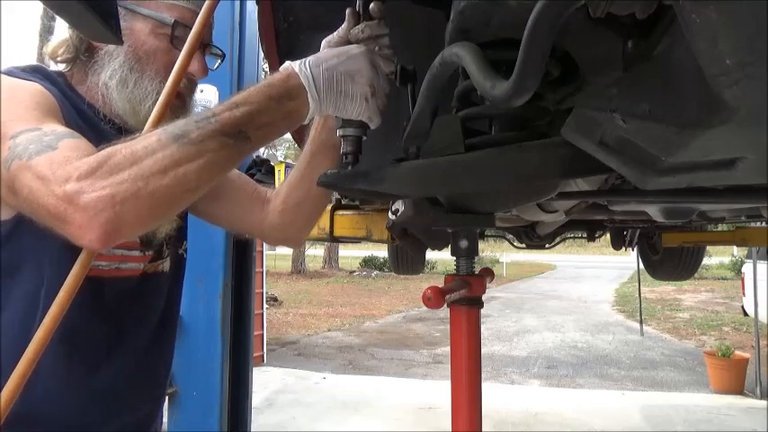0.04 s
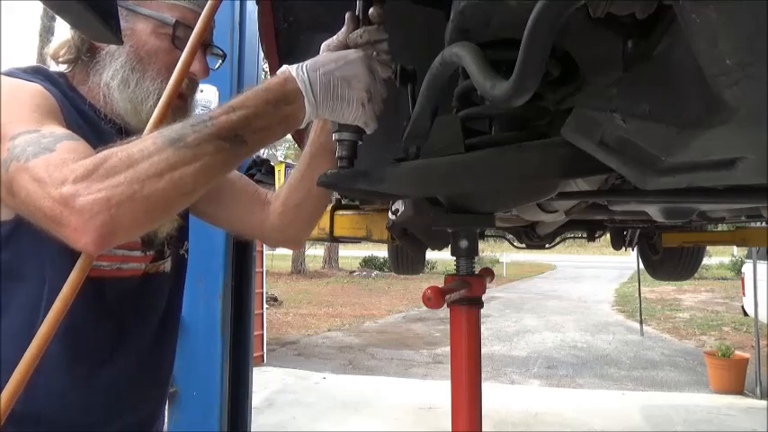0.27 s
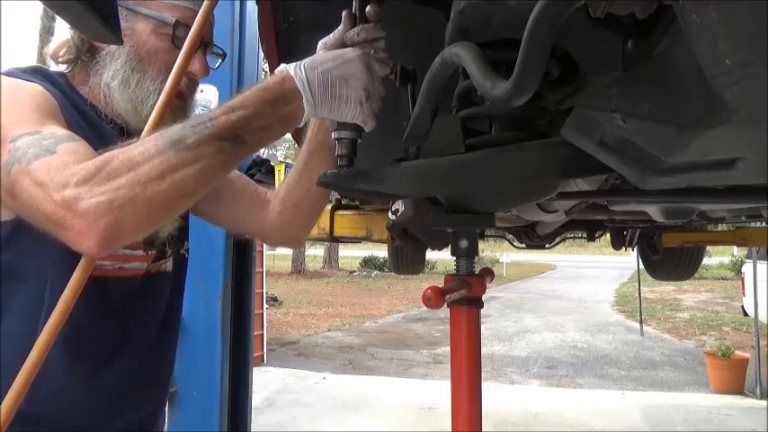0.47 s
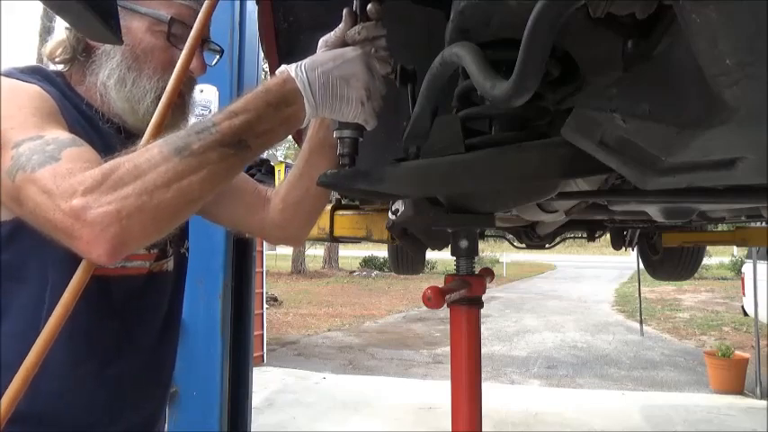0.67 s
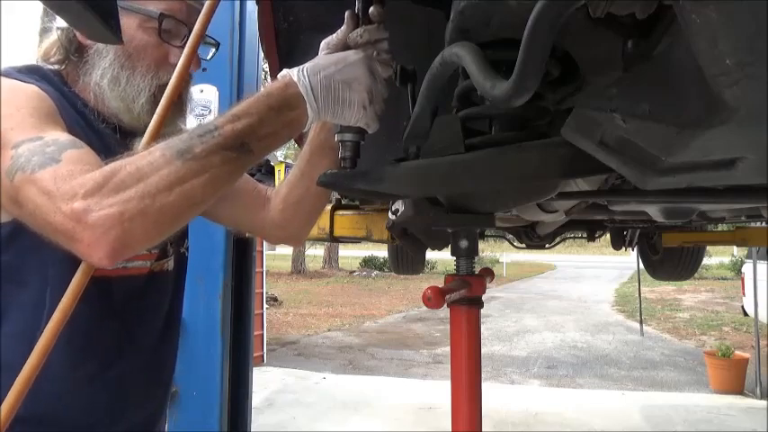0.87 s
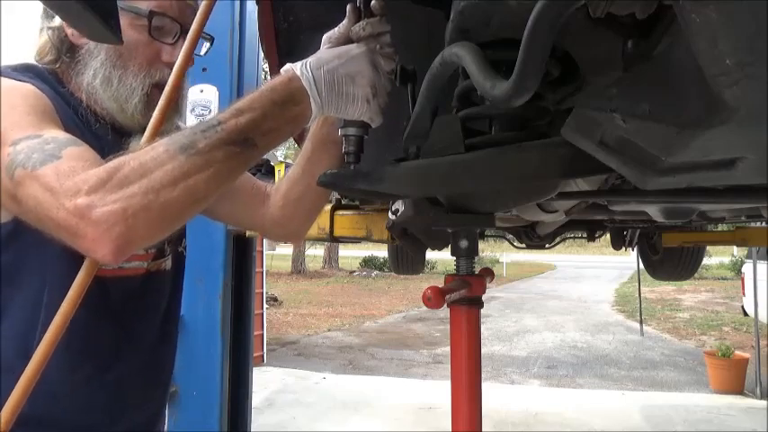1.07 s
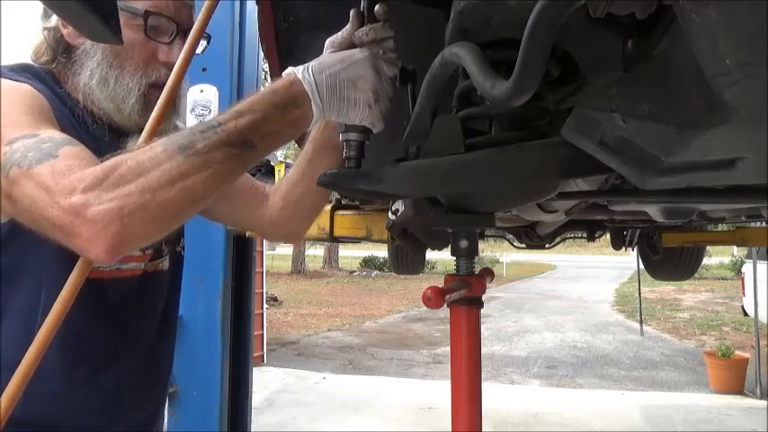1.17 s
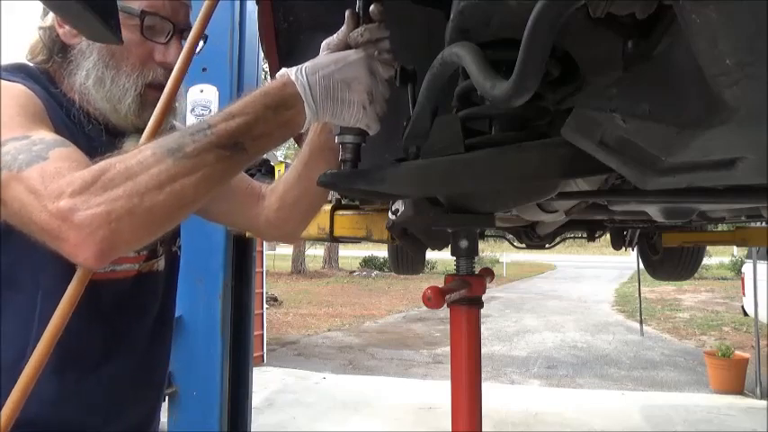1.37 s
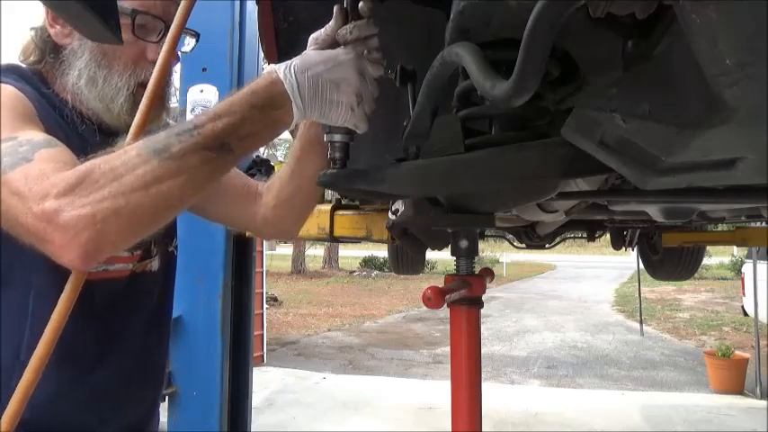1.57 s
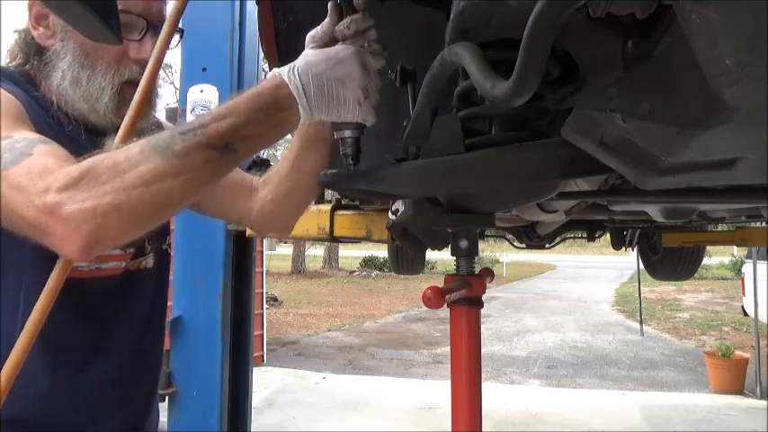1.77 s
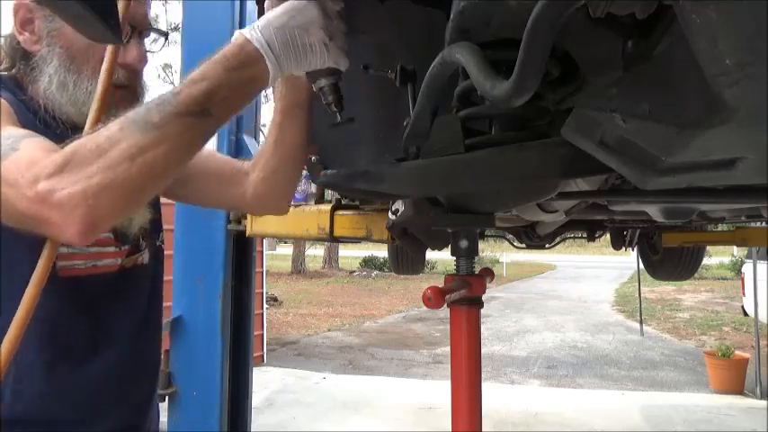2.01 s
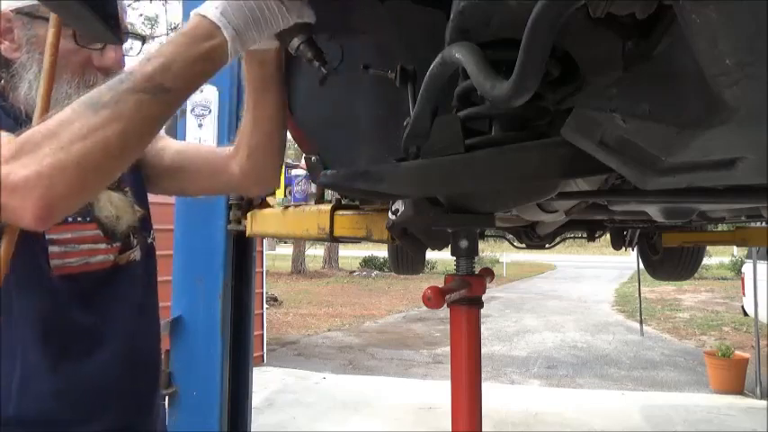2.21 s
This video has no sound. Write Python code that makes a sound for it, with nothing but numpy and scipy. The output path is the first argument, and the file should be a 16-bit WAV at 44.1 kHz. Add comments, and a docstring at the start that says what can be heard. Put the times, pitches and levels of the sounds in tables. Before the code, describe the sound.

An air die grinder rasps a wire wheel on rusty steel in two short whining bursts.

```python
"""An air die grinder spins a wire wheel in a rusty steel bore, in two bursts, in an open garage.
Its vanes puff out a whine, a pulse train through exhaust resonances, that rises and coasts down.
The wires rasp as dense random impacts, snag in short noise bursts and ring the steel.
The tool is drawn out with light knocks, decaying tones over thuds, and a soft bump.
A thin air leak (coloured noise) and a faint hum (an unsteady sine) remain."""
import sys
import numpy as np
from scipy import signal
from scipy.fft import rfft, irfft, next_fast_len
from scipy.io import wavfile
from scipy.ndimage import uniform_filter1d, map_coordinates

SR = 44100
rng = np.random.default_rng(int(sys.argv[2]) if len(sys.argv) > 2 else 0)


def digitize_waveform(pressure):
    """Quantize a signal to 16-bit integers and store it at the path in sys.argv[1].

    Rows of a 2-D input are taken as channels; values are limited to [-1, 1].
    """
    field = np.atleast_2d(pressure).T
    bounded = np.clip(field, -1, 1)
    quanta = np.round(bounded * 32767).astype(np.int16)
    wavfile.write(sys.argv[1], SR, quanta)


N = 99225
T = np.arange(N) / SR  # s
FULL_HZ, VANE_COUNT = 590, 4  # vane puffs a second near full speed; vanes on the rotor


def amp(db):
    """Level to gain: 20 dB is a factor of ten in amplitude."""
    return 10 ** (np.asarray(db) / 20)


def unit(x):
    """Power normalisation: scale to rms 1."""
    return x / np.sqrt(np.mean(x ** 2) + 1e-20)


def along(points, hz):
    """Interpolation of (Hz, value) points on a logarithmic frequency axis."""
    f, v = np.transpose(points)
    return np.interp(np.log(hz + 1), np.log(f + 1), v)


def curve(rows):
    """Linear interpolation of (s, value) rows, one value per sample."""
    return np.interp(T, *np.transpose(rows))


def wobble(rate):
    """Band-limited fluctuation: a smooth curve through random knots, rate knots a second."""
    knots = rng.standard_normal(2 * N)
    return map_coordinates(knots, [T * rate + 2], mode="nearest")


def coloured(x, points):
    """Minimum-phase filtering: a causal filter with the gain of the (Hz, dB) points."""
    m = 2 * next_fast_len(N)
    gain = amp(along(points, np.fft.rfftfreq(m, 1 / SR)))
    # folding the cepstrum onto positive times makes the response causal
    cepstrum = irfft(np.log(gain))
    cepstrum[1:m // 2] *= 2
    cepstrum[m // 2 + 1:] = 0
    response = np.exp(rfft(cepstrum))
    return irfft(rfft(x, m) * response)[:N]


def noise(points):
    """Spectral shaping of white noise, scaled to rms 1."""
    return unit(coloured(rng.standard_normal(N), points))


def dying(start, t60, attack):
    """Exponential decay of a blow, 60 dB in t60 seconds, after a short exponential attack."""
    t = np.maximum(T - start, 0)
    return amp(-60 * t / t60) * (1 - np.exp(-t / attack))


def swell(middle, length):
    """Gaussian envelope with standard deviation length, in seconds."""
    return np.exp(-((T - middle) / length) ** 2 / 2)


def wire_strikes(rate, scatter_db):
    """Poisson-like impacts, rate a second; dividing by its root keeps the power even."""
    hit = rng.random(N) < rate / SR
    sign = rng.choice([-1, 1], N)
    size = amp(scatter_db * rng.standard_normal(N))
    return unit(hit * sign * size / np.sqrt(rate))


def background():
    """Superposed steady sources: garage air, hum, turbulent leak, and the barely opened valve."""
    # colour of the garage air: freq_hz, gain_db
    garage_air = [(25,-25),(100,1.5),(200,3),(290,6),(330,-10),(372,9),(450,-15),(600,-30),(780,-2.5),(1200,-12),(1800,-6),(2500,-10),(3100,8.5),(3700,0),(4700,7),(6500,-11),(9000,0),(16000,-4)]
    # colour of the air leak: freq_hz, gain_db
    leak_colour = [(100,-57),(6500,-16),(9000,-6),(10500,2.5),(11500,1),(13000,-12),(14500,-3),(16000,-41)]
    # the leak swells as the hose turns: time_s, level_db
    leak_level = [(0,-46.5),(1.68,-50.5),(1.85,-47),(2.0,-52),(2.25,-45)]
    # colour of the barely opened valve: freq_hz, gain_db
    valve_colour = [(100,-52),(700,-9.5),(1800,-30),(3200,-7.5),(3700,-17),(4300,-4),(4900,-7),(5700,-31),(7500,-22),(16000,-38)]
    hum_hz, hum_db = 162, -63
    air_db, valve_db = -51.5, -43.5

    hum_tone = np.sqrt(2) * np.sin(2 * np.pi * hum_hz * T + .3 * wobble(7))
    hum = hum_tone * amp(hum_db + 2 * wobble(12))
    leak = noise(leak_colour) * amp(curve(leak_level) + 2.4 * wobble(14.13))
    valve = noise(valve_colour) * amp(valve_db) * np.interp(T, [.25, .35], [1, 0])
    return hum + leak + valve + amp(air_db) * noise(garage_air)


def room(x):
    """Reverberation from underbody and walls: a noise tail with frequency-dependent decay."""
    # reverberation time: freq_hz, t60_s
    room_t60 = [(200,0.14),(1500,0.13),(5000,0.076),(12000,0.093)]
    hz, t, bins = signal.stft(rng.standard_normal(SR // 2), SR, nperseg=256)
    decay = amp(-60 * t / along(room_t60, hz)[:, None])
    tail = signal.istft(bins * decay, SR, nperseg=256)[1]
    delayed = np.pad(tail, (90, 0))  # 90 samples, about 2 ms, before the reflections
    return signal.fftconvolve(x, delayed / np.linalg.norm(tail))[:N]


def handling():
    """Damped broadband impact: a soft bump of the tool as it is lifted out."""
    bump_colour = [(40, -26), (160, -13), (280, 13), (450, -10),
                   (1200, -5), (3000, -16), (16000, -35)]  # freq_hz, gain_db
    return amp(-46.5) * noise(bump_colour) * dying(1.8, 0.33, attack=0.0048)


def knocks():
    """Modal excitation as the wheel bumps the steel: a short rough ring over a noisy thud."""
    # knocks on the steel: start_s, level_db, ring_hz, ring_t60_s, thud_over_ring_db
    knock_rows = [(0.235,-8.5,1260,0.037,-9),(1.599,-25.5,1520,0.12,4),(1.747,-49.5,1490,0.076,6.5),(1.795,-41.5,2030,0.066,-0.5)]
    # colour of the thud: freq_hz, gain_db
    thud_colour = [(60,-28),(250,-14.5),(650,-0.5),(1300,3.5),(2000,-1.5),(2400,-4),(3000,-3.5),(3600,-3),(6000,-3),(16000,-27)]
    thud_t60_s = 0.08
    out = np.zeros(N)
    for start, db, hz, t60, thud_db in knock_rows:
        tone = np.sin(2 * np.pi * hz * (T - start) + .5 * wobble(200))
        ring = tone * dying(start, t60, attack=0.0024)
        thud = amp(thud_db) * noise(thud_colour) * dying(start, thud_t60_s, attack=0.00064)
        out += amp(db) * (ring + thud)
    return out


def snags():
    """Stick and release: tufts of wire catch and flick free as brief noise bursts."""
    # snagging tufts: middle_s, level_db, length_s
    snag_rows = [(0.2267,-18.5,0.0019),(0.232,-17.5,0.0018),(0.235,-15,0.00074),(0.2733,-7.5,0.0014),(0.286,-16,0.0019),(0.296,-11.5,0.0016),(0.649,-32,0.0011),(0.678,-15.5,0.00083),(0.6856,-14,0.00092),(0.693,-14,.001),(0.7,-19.5,0.0014),(0.719,-21,0.00067),(0.741,-24,0.0014),(0.7714,-16.5,0.00073),(0.7771,-18,0.0014),(0.7846,-15.5,0.00041)]
    # colour of a snag: freq_hz, gain_db
    snag_colour = [(40,-55),(150,-34),(600,-12),(1600,-4),(3200,-8),(4600,5),(5600,-1),(7000,-2),(9000,-4),(11000,0),(16000,-10)]
    bursts = sum(amp(db) * swell(middle, length) for middle, db, length in snag_rows)
    return noise(snag_colour) * bursts


def singing():
    """Narrow-band noise by quadrature modulation: at some angles the wire tips sing."""
    # singing wire tips: middle_s, length_s, level_db, centre_hz, width_hz
    singing_rows = [(0.555,0.084,-23,10050,910),(1.371,.09,-24,12560,1544),(1.512,0.038,-21.5,9830,642)]
    out = np.zeros(N)
    for middle, length, db, hz, width in singing_rows:
        phase = 2 * np.pi * hz * T
        band = wobble(width) * np.cos(phase) + wobble(width) * np.sin(phase)
        out += amp(db) * swell(middle, length) * band
    return out


def patchy(x, depth_db):
    """Time-varying filtering: the wires meet ever new spots, so the rasp's colour keeps shifting."""
    bins = signal.stft(x, nperseg=512)[2]
    across_hz = uniform_filter1d(rng.standard_normal(bins.shape), size=7, axis=0)
    field = uniform_filter1d(across_hz, size=12, axis=1)
    return signal.istft(bins * amp(depth_db * unit(field)), nperseg=512)[1][:N]


def wire_wheel(puff_hz, puffs):
    """Impact excitation: wire tips strike rust, denser at speed, beating with shaft and vanes."""
    # how hard the wires scrub, before the rasp trim: time_s, level_db
    scrub = [(0.1,-48),(0.15,-31),(0.19,-25),(0.215,-24),(0.228,-25.5),(0.255,-26),(0.278,-22),(0.305,-12),(0.45,-16),(0.53,-13.5),(0.62,-16.5),(0.7,-30.5),(0.735,-29.5),(0.765,-27),(0.81,-19),(0.85,-11),(1.0,-12.5),(1.22,-15.5),(1.43,-12.5),(1.53,-17.5),(1.57,-20),(1.605,-33.5),(1.635,-52)]
    # colour of the rasp: freq_hz, gain_db
    rasp_colour = [(30,-7),(130,-56),(280,-37),(500,-8),(800,-19.5),(1300,-5),(2200,-1.5),(3200,1),(4000,6),(5100,8.5),(6500,3),(7600,4.5),(8600,2),(10000,8),(11300,5.5),(12600,4),(14500,-0.5),(16000,-11.5)]
    # ring of the bore under the wires: time_s, level_db
    bore_ring = [(0.12,-53.5),(0.2,-36.5),(0.3,-31),(0.45,-36.5),(0.52,-28.5),(0.63,-26.5),(0.73,-36.5),(0.86,-46),(1.1,-53),(1.38,-30.5),(1.5,-16.5),(1.56,-24.5),(1.62,-45),(1.68,-67)]
    # resonances of the bore: freq_hz, gain_db
    bore_colour = [(30,-70),(250,-30),(550,-16),(900,-10),(1250,0),(1700,2),(2100,-4),(2900,-20),(3900,-20),(4500,-8),(5300,-8),(6000,-22),(16000,-45)]
    # dull grinding under load, as the wheel bites or drags to a stop: time_s, level_db
    grind_level = [(0.13,-64),(0.19,-42.5),(0.27,-43),(0.31,-21),(0.37,-54),(0.46,-50),(0.56,-29.5),(0.66,-37),(0.73,-39.5),(0.78,-34),(0.86,-23.5),(0.93,-51),(1.25,-61),(1.4,-47),(1.5,-34),(1.58,-32.5),(1.68,-49.5),(1.74,-55)]
    # colour of the grinding: freq_hz, gain_db
    grind_colour = [(30,-65),(110,-24),(200,-15.5),(320,-5.5),(460,3.5),(650,5.5),(800,5),(1100,7.5),(2000,6),(5000,-22),(16000,-42)]
    rasp_trim_db = -1.5
    shaft_beat, vane_beat = 0.067, 0.14  # modulation depths

    shaft = shaft_beat * np.cos(2 * np.pi * puffs / VANE_COUNT)
    beat = 1 + shaft + vane_beat * np.cos(2 * np.pi * puffs)
    # the rasp is more uneven when slow
    unevenness = amp(0.45 * wobble(260) * np.sqrt(FULL_HZ / puff_hz))
    strikes = wire_strikes(puff_hz * 36, scatter_db=1.5) * beat * unevenness
    rasp = unit(coloured(strikes, rasp_colour)) * amp(curve(scrub) + rasp_trim_db)
    rasp *= np.interp(T, [.06, .12, 1.62, 1.68], [0, 1, 1, 0])
    bore_strikes = wire_strikes(puff_hz * 6, scatter_db=2.5) * beat
    ring = unit(coloured(bore_strikes, bore_colour)) * amp(curve(bore_ring))
    grind_strikes = wire_strikes(puff_hz * 4, scatter_db=1) * beat
    grind = unit(coloured(grind_strikes, grind_colour)) * amp(curve(grind_level))
    return rasp + ring + grind


def exhaust(puff_hz, puffs, scatter_db=.5, jitter_s=.000004):
    """Source and filter: one puff per vane excites low and shrill exhaust resonances."""
    # relative puff size of each vane, in order round the rotor: size
    vane_sizes = [1.05, .98, 1.01, .96]
    # level of the whine's fundamental: time_s, level_db
    fundamental_level = [(0.28,-52),(0.335,-38.5),(0.372,-42),(0.41,-28.5),(0.49,-26.5),(0.515,-39),(0.54,-25),(0.59,-43.5),(0.68,-62),(0.8,-60.5),(0.88,-42.5),(0.945,-44.5),(1.02,-27),(1.105,-33.5),(1.17,-26.5),(1.26,-27.5),(1.295,-38),(1.33,-25.5),(1.375,-39.5),(1.42,-26),(1.49,-46),(1.57,-46.5),(1.61,-64)]
    # level of the whine's middle overtones: time_s, level_db
    overtone_level = [(0.28,-36),(0.33,-22.5),(0.41,-25.5),(0.48,-24.5),(0.52,-16),(0.57,-26),(0.64,-37),(0.69,-38),(0.79,-58),(0.85,-21),(0.93,-22),(1.0,-20.5),(1.1,-20.5),(1.17,-25.5),(1.28,-23.5),(1.38,-19),(1.46,-23),(1.54,-30.5),(1.6,-50)]
    # level of the shrill part, heard near full speed: time_s, level_db
    shrill_level = [(0.3,-55),(0.355,-27),(0.39,-17),(0.43,-15.5),(0.485,-18.5),(0.51,-32),(0.57,-55),(0.86,-55),(0.925,-26),(0.96,-15.5),(1.05,-17),(1.11,-16),(1.16,-18.5),(1.2,-16.5),(1.25,-18),(1.3,-14.5),(1.345,-22),(1.41,-32),(1.5,-55)]
    # low resonances of the exhaust: freq_hz, gain_db
    low_colour = [(100,-34),(300,-7),(480,-0.5),(650,2.5),(800,1.5),(950,0),(1080,1.5),(1170,5.5),(1300,-0.5),(1550,2),(1760,6),(2100,-9),(2350,-2.5),(3000,-4),(4000,-18),(16000,-75)]
    # shrill resonances of the exhaust: freq_hz, gain_db
    high_colour = [(500,-55),(2600,-36),(3250,-20),(3520,-6),(3680,-11),(4100,2),(4300,2),(4650,-3),(4900,-1),(5100,-3),(5400,-7),(5900,-13),(7000,-22),(8800,-17),(9500,-18),(9900,-9),(10600,-18),(16000,-32)]

    k = np.arange(1, int(puffs[-1]))
    chance = rng.standard_normal((N // 10, 2))[:len(k)]
    at = (np.interp(k, puffs, T) + jitter_s * chance[:, 0]) * SR
    size = np.take(vane_sizes, k % VANE_COUNT) * amp(scatter_db * chance[:, 1])
    # a windowed sinc places each puff between samples
    taps = at.astype(int)[:, None] + np.arange(-7, 9)
    offset = taps - at[:, None]
    shape = np.sinc(offset) * np.cos(np.pi * offset / 16) ** 2
    train = np.bincount(np.clip(taps, 0, N - 1).ravel(), (size[:, None] * shape).ravel(), N)
    # take out the steady flow and the fundamental, which has its own level
    cycle = np.cos(2 * np.pi * puffs)
    flow = puff_hz / SR * (1 + 2 * cycle)
    overtones = (np.mean(vane_sizes) * flow - train) * np.sqrt(FULL_HZ / puff_hz)

    base = -np.sqrt(2) * cycle * amp(curve(fundamental_level))
    low_gain = amp(curve(overtone_level) + 1.4 * wobble(29.82))
    low = unit(coloured(overtones, low_colour)) * low_gain
    high_gain = amp(curve(shrill_level) + 0.89 * wobble(17.4))
    high = unit(coloured(overtones, high_colour)) * high_gain
    whine = coloured(base + low + high, [(20, -37), (110, -0.5), (16000, 0)])  # low cut
    return whine * np.interp(T, [.26, .29, 1.59, 1.62], [0, 1, 1, 0])


def scene():
    """Common excitation: one rotor speed drives whine and rasp, heard in mid and side signals."""
    # first burst of the rotor: time_s, vane_puffs_hz
    first_burst = [(0.29, 140.6), (0.334, 349.3), (0.35, 458.0), (0.382, 581.4), (0.434, 613.7),
                   (0.48, 568), (0.52, 512.8), (0.554, 413), (0.656, 184), (0.68, 147.9)]
    # second burst of the rotor: time_s, vane_puffs_hz
    second_burst = [(0.8, 145.2), (0.812, 176.5), (0.826, 209.5), (0.864, 314.1), (0.894, 413.7),
                    (0.918, 490.8), (0.946, 547.7), (0.97, 583.7), (1.106, 590.4), (1.2, 607.1),
                    (1.28, 580), (1.36, 525.7), (1.418, 453.8), (1.468, 370.6), (1.568, 178.4), (1.6, 133)]
    # colour of the sound sent to the room: freq_hz, gain_db
    room_colour = [(100,-19.5),(400,9),(1500,5.5),(4000,1.5),(16000,1)]
    # level of the side signal by frequency, low-passed above about 11 kHz: freq_hz, side_over_mid_db
    side_level = [(100,-30),(350,-25.5),(700,-17),(1400,-10.5),(3000,-12),(9000,-2.5),(11500,-14.5),(13000,-46)]
    whine_room_db, wheel_room_db = -13.5, -13.5

    smooth_hz = uniform_filter1d(curve(list(first_burst) + list(second_burst)), size=600)
    puff_hz = smooth_hz * (1 + .0012 * wobble(60.7))
    puffs = np.cumsum(puff_hz) / SR  # running count of vane puffs

    floor = background()
    rubbing = patchy(wire_wheel(puff_hz, puffs), depth_db=1.94)
    wheel = rubbing + singing() + snags() + knocks() + handling()
    whine = exhaust(puff_hz, puffs)
    sent = coloured(amp(whine_room_db) * whine + amp(wheel_room_db) * wheel, room_colour)
    mid = whine + wheel + room(sent) + floor
    # a second, independent tail makes the channels differ
    side = coloured(room(sent + amp(-5) * floor), side_level)
    return np.array([mid + side, mid - side])


def record(dry):
    """Saturation and band limiting: round off the highest peaks, keep nothing above the limit."""
    top_hz = 15900
    held = dry / (1 + np.abs(dry) ** 14) ** (1 / 14)
    m = next_fast_len(N + SR // 2)
    passed = np.fft.rfftfreq(m, 1 / SR) < top_hz
    return irfft(rfft(held, m) * passed, m)[:, :N]


dry = scene()
out = record(dry)
digitize_waveform(out)
```